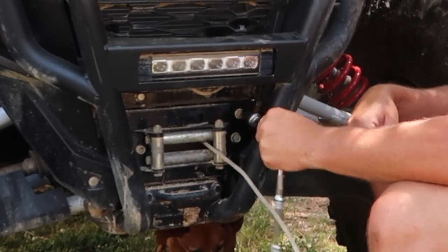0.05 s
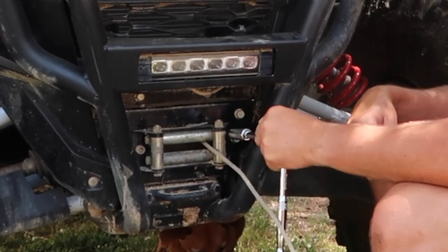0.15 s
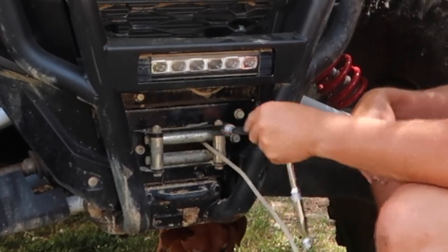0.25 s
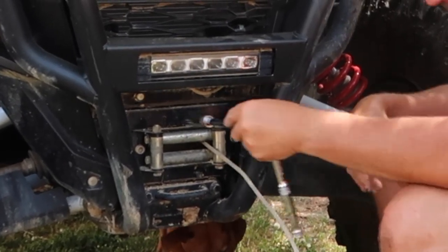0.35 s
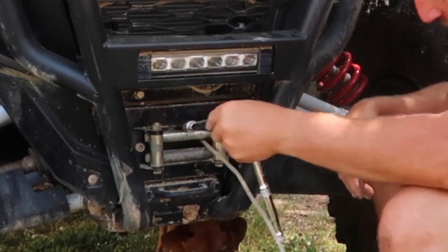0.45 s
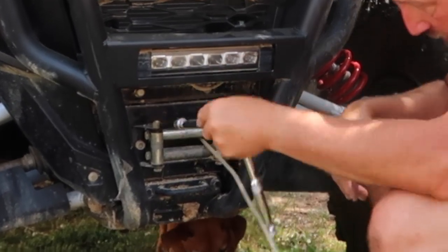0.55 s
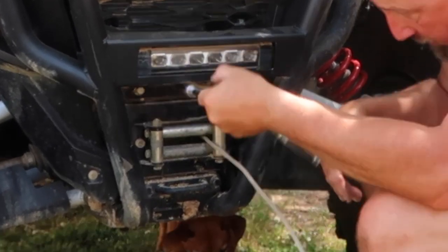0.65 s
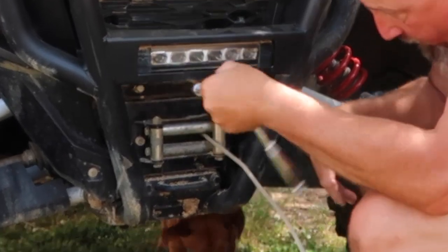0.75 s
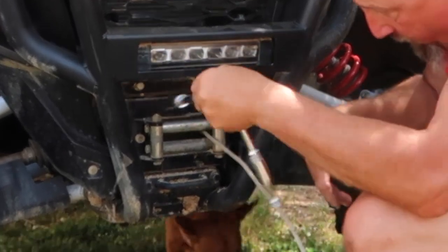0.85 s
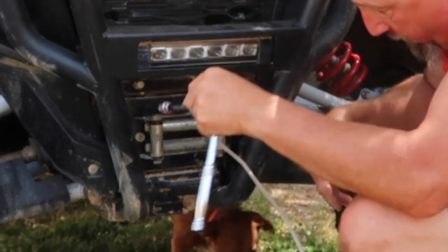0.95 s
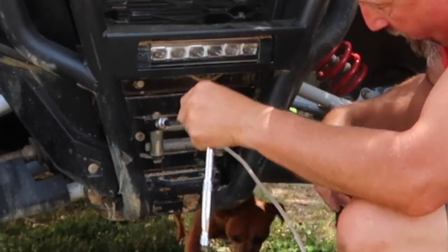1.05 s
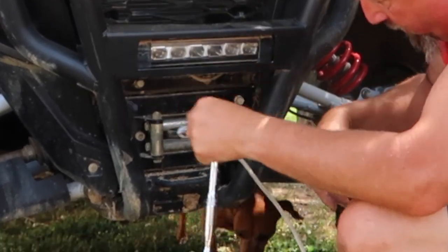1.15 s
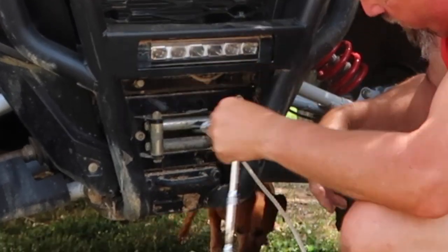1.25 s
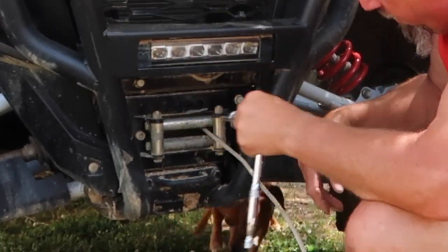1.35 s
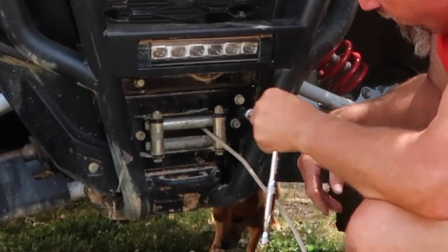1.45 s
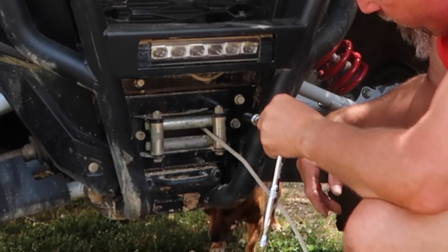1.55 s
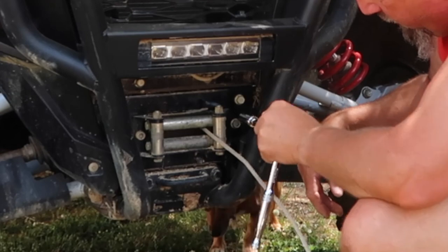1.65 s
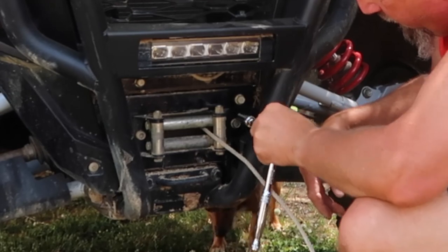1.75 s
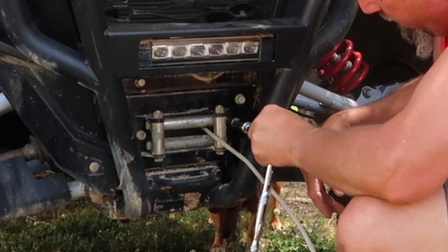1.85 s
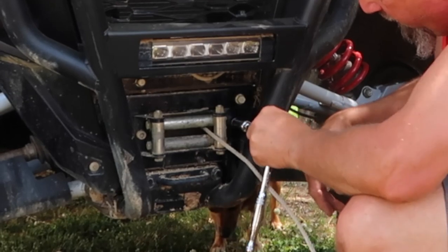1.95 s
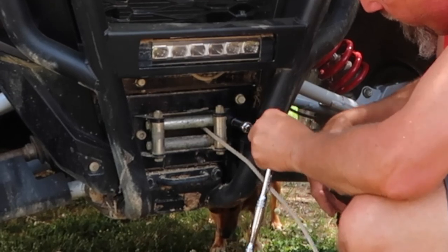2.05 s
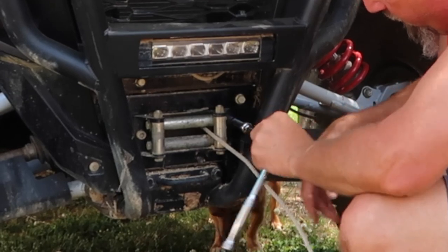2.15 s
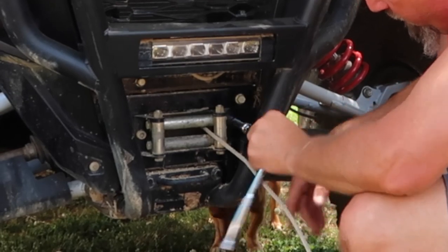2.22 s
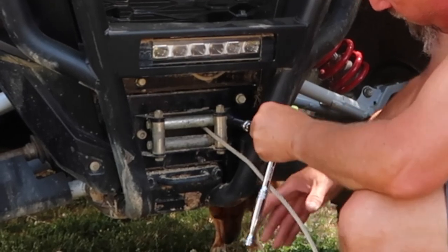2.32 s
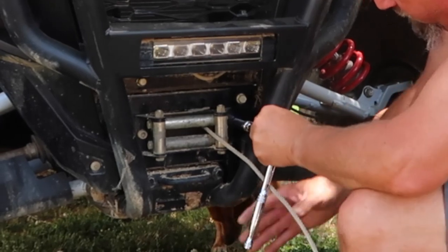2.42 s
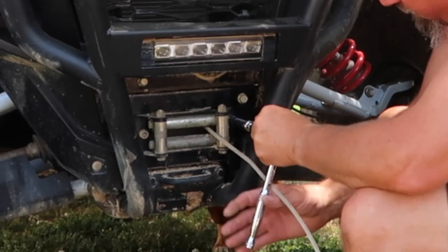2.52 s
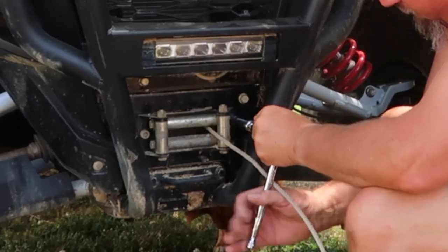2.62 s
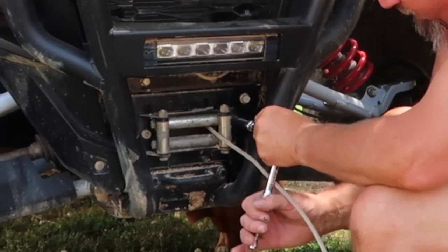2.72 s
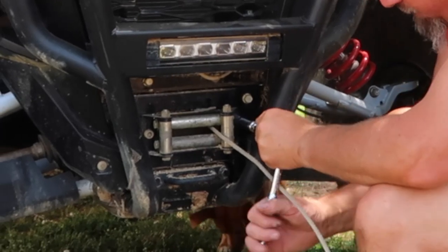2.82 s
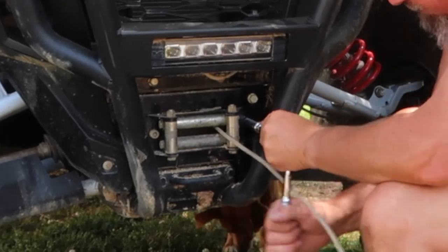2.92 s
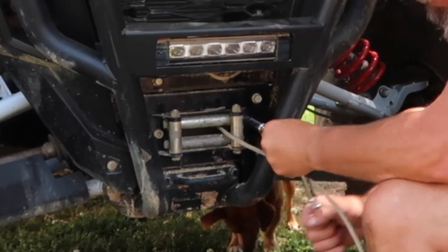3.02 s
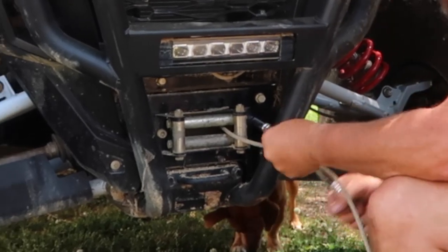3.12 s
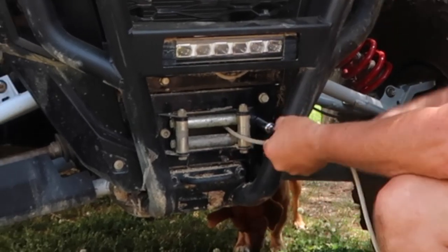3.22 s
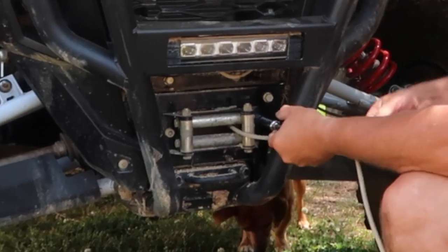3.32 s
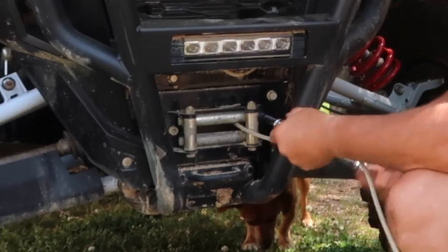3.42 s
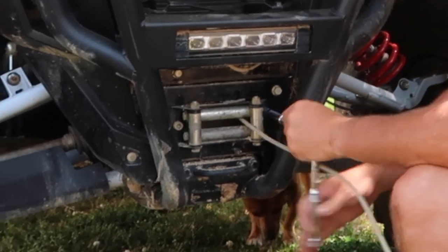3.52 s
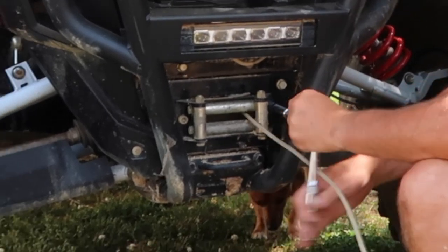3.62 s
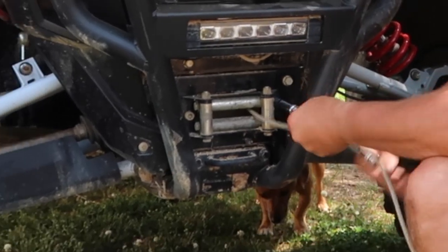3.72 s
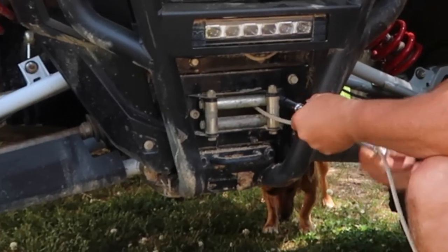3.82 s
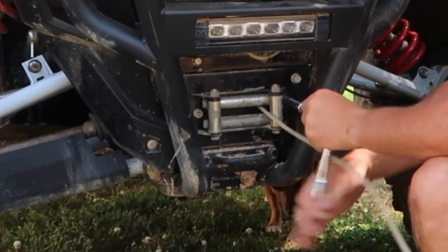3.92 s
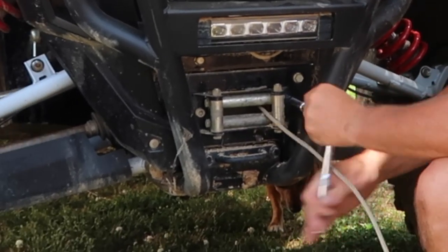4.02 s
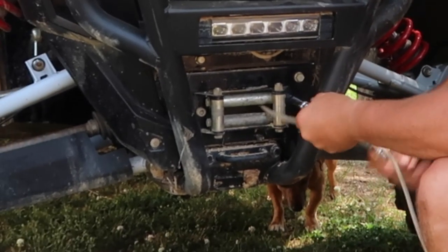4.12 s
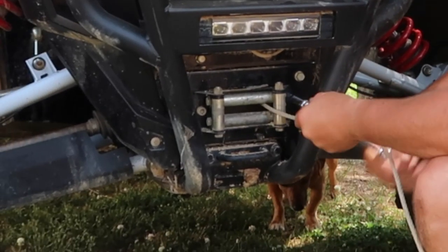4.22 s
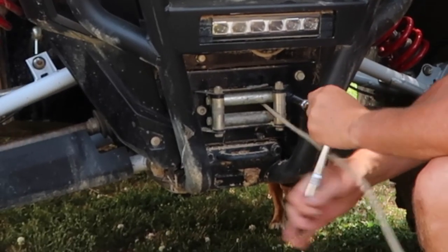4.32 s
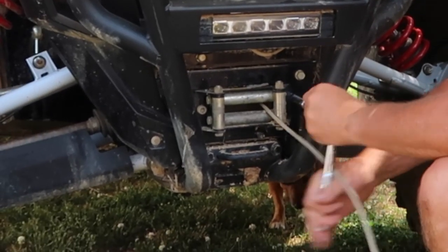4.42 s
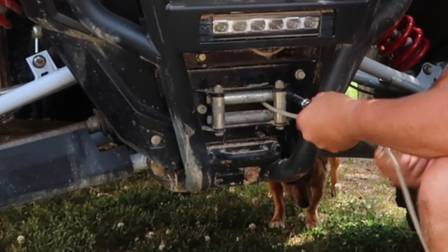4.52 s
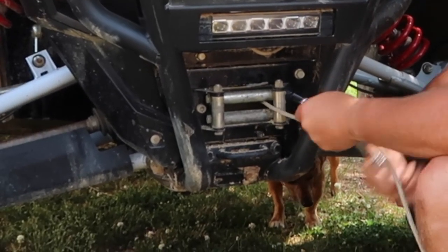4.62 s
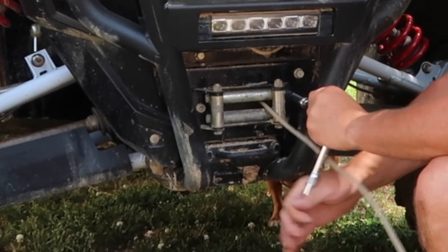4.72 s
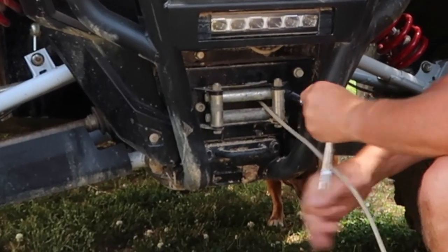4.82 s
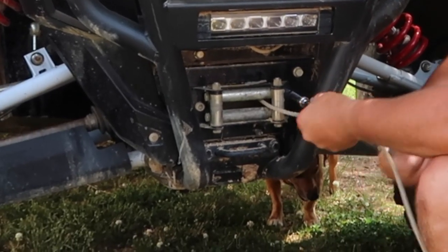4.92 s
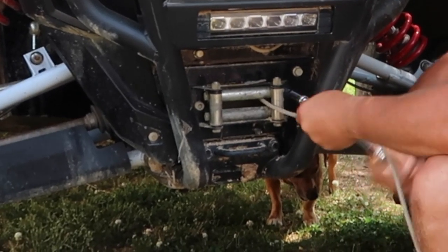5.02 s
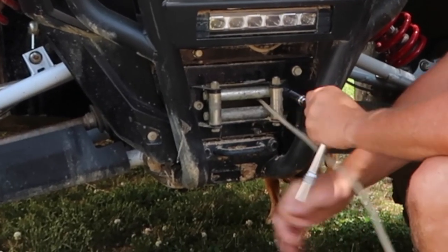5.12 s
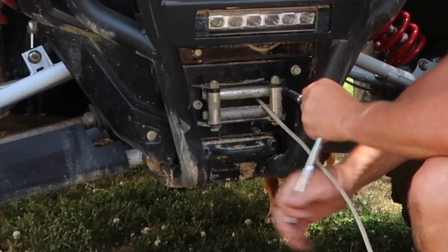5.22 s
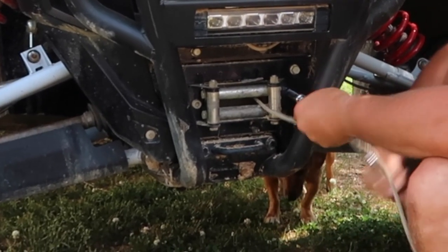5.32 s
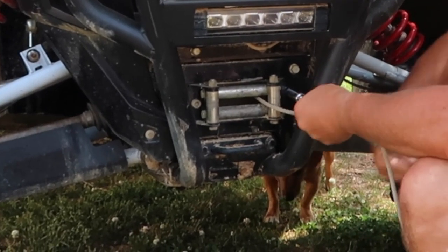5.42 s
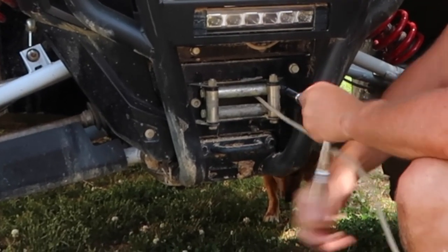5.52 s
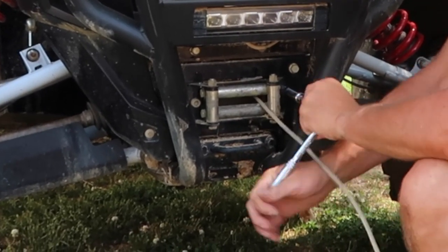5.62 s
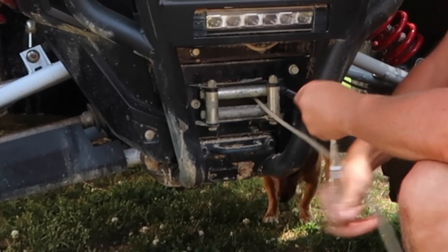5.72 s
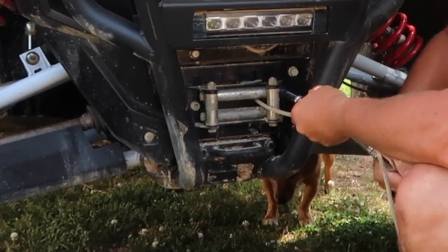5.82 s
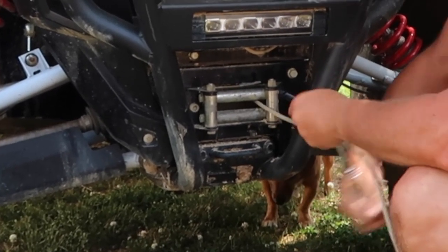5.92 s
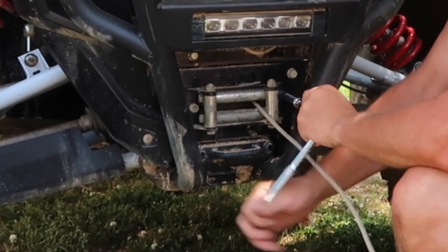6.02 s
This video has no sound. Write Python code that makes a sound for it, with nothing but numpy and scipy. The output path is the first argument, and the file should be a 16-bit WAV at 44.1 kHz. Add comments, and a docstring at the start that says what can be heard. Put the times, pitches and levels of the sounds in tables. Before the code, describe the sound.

Outdoors, one hard steel snap rings a vehicle frame, a loose socket clinks on a bolt, then a ratchet clicks in seven quick runs.

```python
"""Ratchet on a steel front plate

Outdoors on grass, no walls near: a socket ratchet works a bolt on an off-road vehicle, straight ahead of a stereo pair.
Far off, a motor hums as two wavering sines over low rumble and faint air of coloured noise; small ticks, rubs and chirps.
One hard snap, noise bursts and ringing modes, sounds the frame and ducks the recorder's gain; the socket clinks on the bolt.
On each return swing the pawl rattles over the teeth, click by click, then knocks as it takes hold again."""
import sys
import numpy as np
from scipy import signal
from scipy.fft import rfft, irfft, next_fast_len
from scipy.io import wavfile
from scipy.ndimage import map_coordinates

SR = 44100
rng = np.random.default_rng(int(sys.argv[2]) if len(sys.argv) > 2 else 0)


def transcribe(signal):
    """Save signal, clipped to [-1, 1], as a 16-bit WAV file at the path in sys.argv[1]."""
    frames = np.atleast_2d(signal).T
    limited = np.clip(frames, -1, 1)
    pcm = np.round(limited * 32767).astype(np.int16)
    wavfile.write(sys.argv[1], SR, pcm)


N = 267246

# Levels in the tables are relative where a layer adds its own trim.
# far motor, slow swells of its octave: (time [s], level [dB])
OCTAVE_SWELLS = [(0.0, -47), (0.2, -42), (1.47, -51), (2.21, -37.5), (2.5, -48.5), (5.81, -36), (5.92, -60),
                 (6.06, -43.5)]
# colour of the open air: (frequency [Hz], density [dB per Hz])
AIR_COLOUR = [(18, -15.5), (33, -14), (48, -3.5), (70, -5), (140, -2.5), (200, -11), (390, -18.5),
              (650, -25.5), (1050, -28), (1330, -28), (1550, -31), (3500, -38), (7000, -49), (15000, -64)]
# the bolt rubs faintly in its thread: (time [s], level [dB])
RUBS = [(0.266, -48), (0.526, -48), (2.191, -54), (2.799, -55), (3.041, -50)]
# faint high chirps: (time [s], level [dB], start pitch [Hz], held pitch [Hz])
CHIRPS = [(1.037, -53, 3600, 3860), (2.678, -49.5, 4900, 3740)]
# small dry ticks of the pawl and the loose joints: (time [s], level [dB])
TICKS = [(0.055, -39.5), (0.089, -40), (0.501, -45.5), (2.331, -36), (3.486, -39), (3.7743, -34),
         (4.141, -48), (4.153, -43), (4.528, -28), (4.902, -33.5), (5.363, -32), (5.808, -41)]
# the loose socket meets the bolt head and rebounds:
# (time [s], knock [dB], treble lift [dB], plate ring [dB], socket ring [dB], socket sharp by [Hz])
CLINKS = [(1.6751, -12, -8.5, -32, -20, 8.5), (1.6858, -18, -11, -25.5, -28.5, 58.5),
          (1.984, -17, -6.5, -35.5, -36, 0.5), (2.003, -24.5, 6.5, -43, -43, 7.5),
          (2.2405, -15, 8.5, -25, -32, 18), (2.2500, -13, -19, -28, -29, 55),
          (2.333, -26, -1.5, -42, -48, 36)]
# single knocks as the tool is handled: (time [s], level [dB], treble lift [dB])
KNOCKS = [(0.002, -27.5, -6), (0.03, -31, 4), (0.241, -35, 2), (1.799, -26.5, -16), (2.232, -24, -3),
          (2.3754, -11, 0), (3.366, -26.5, -6), (4.172, -31, -7), (4.245, -28, -10), (4.64, -40, -18),
          (5.035, -35, -16)]
# lead-in, blow and rebounds of the hard snap: (time [s], level [dB])
SNAP = [(0.761, -30.5), (0.7640, -24.5), (0.7677, 6), (0.7707, 2), (0.7833, -8.5), (0.7905, -13.5)]
# return swings of the handle: (first tooth [s], last tooth [s], hardest moment [s], level [dB],
# share that shakes the plate [dB], ping of the socket on the bolt [dB], treble lift [dB],
# the pawl takes hold again [s], level of that catch [dB])
SWINGS = [(3.5192, 3.6763, 3.620, -24.5, -8.5, -5, -1.5, 3.7745, -15),
          (3.9746, 4.067, 4.026, -22.5, 1.5, -22, -2, 4.141, -19.5),
          (4.3582, 4.458, 4.402, -23, 2.5, -5.5, -1.5, 4.533, -19),
          (4.744, 4.854, 4.778, -25, 2, -22, 3.5, 4.946, -26),
          (5.155, 5.279, 5.205, -22.5, -0.5, -18, 1, 5.367, -20.5),
          (5.5808, 5.713, 5.615, -22, -0.5, -6.5, 2, 5.804, -22),
          (6.04, 6.149, 6.080, -28.5, 10, 1.5, 5, 6.24, -23)]
# teeth passed in each swing: (teeth [count])
TEETH = [18, 14, 15, 16, 17, 17, 17]

# ringing modes of the vehicle's frame, the socket, the front plate with the wrench on it, and the ratchet head:
# (frequency [Hz], level [dB], decay by 60 dB [s])
FRAME_MODES = [(300, 3.5, 0.24), (392, -6, 0.83), (802, 2, 0.19), (963, -3.5, 0.26), (1020, 4, 0.26),
               (1172, 5.5, .23), (1340, -10, .75), (1570, -1, .24), (1696, -5, .3), (2083, -6.5, 0.35),
               (2234, 12, .16), (2400, -0.5, 0.32), (2649, -7, .29), (2765, 2, 0.12), (3074, -4, .28),
               (3200, -1, .27), (3372, -2, .22), (3375, -1, 0.24), (3430, -11, 0.6), (3746, -2.5, .2),
               (4140, -8, 0.28), (4183, -6, 0.35), (4376, -2.5, .16), (4511, -8, .28), (4613, -5, .16),
               (4931, -2, .2), (5082, -2.5, 0.24), (5728, -3.5, .14), (6255, -9, .15), (6578, -8.5, 0.21),
               (7063, -12.5, .2), (7985, -6.5, .16)]
SOCKET_MODES = [(3002, 2, 0.3), (3075, -11, 0.38), (3090, 3.5, 0.14), (3230, -26, 0.25)]
PLATE_MODES = [(914.4, -5.5, 0.23), (1026.7, -11.5, 0.2), (1068, -2, 0.11), (1215, -8.5, 0.19),
               (1299, -15.5, 0.46), (1587, -6, 0.14), (1677, 1.5, 0.045), (2222, 8, 0.023),
               (2316, -15, 0.19), (2496, -11.5, 0.19), (3206, -20, 0.34), (3740, -21, 0.28),
               (3930, -27, 0.2), (4310, -20, 0.19), (5440, -18, 0.084)]
HEAD_MODES = [(2465, 4.5, 0.065), (2600, 0, 0.041), (3165, -3.5, 0.053), (3310, -14.5, 0.027),
              (3780, -2.5, 0.088), (4086, 2, 0.041), (4560, -3, 0.042), (5290, -9, .03),
              (5990, -1.5, 0.028), (7130, -8, 0.03), (11000, -18, .025)]
# dense modes of the bodywork, decay at unit length: (frequency [Hz], decay by 60 dB [s])
DAMPING = [(250, 0.65), (1000, 0.33), (3000, 0.26), (6000, 0.19), (12000, 0.25)]

# noise colours of pawl clicks, rattling panels, knocks, the snap's crack and clang, the socket's landing, small ticks:
# (frequency [Hz], density [dB per Hz])
PAWL_COLOUR = [(650, -19), (870, -9.5), (1250, 1.5), (1490, -12.5), (2140, 0.5), (2460, 1.5), (2830, -7),
               (3320, -1.5), (4930, -9), (6870, -14), (8700, -23), (11600, -19), (15500, -35)]
RATTLE_COLOUR = [(300, -12), (700, -16), (950, -19), (1600, 2), (1900, -4), (2350, -2), (2800, -2.5),
                 (3900, -2.5), (5300, -11), (7200, -9.5), (8900, -28), (11500, -21), (15500, -42)]
THUD_COLOUR = [(150, -38), (260, 1), (450, -4.5), (680, -10), (1000, 3), (1500, -3.5), (1900, -7),
               (2400, -4.5), (2800, -14.5), (3200, -4.5), (4500, -17.5), (6800, -24.5), (10000, -36),
               (15000, -59)]
CRACK_COLOUR = [(180, -53), (300, -27), (821, -27), (1090, -17.5), (1840, -22), (2040, -8), (2440, 5.5),
                (2770, 5.5), (3230, -12.5), (4210, -1.5), (5210, -3), (5760, -15.5), (11100, -21),
                (15500, -35)]
CLANG_COLOUR = [(150, -17.5), (310, -6.5), (600, -12), (1100, 2), (1700, -12), (2350, 4), (2900, -7),
                (4800, -2), (5800, -9.5), (8200, -11), (10000, -24.5), (14500, -29)]
LANDING_COLOUR = [(150, -17), (370, -3.5), (600, -8.5), (790, -9.5), (950, -4.5), (1350, -6), (1620, 2),
                  (1950, -9.5), (2200, -2), (2700, -1), (4200, -5), (5500, -11.5), (7600, -26), (9500, -27),
                  (15000, -44)]
TICK_COLOUR = [(800, 5), (2000, 0), (3500, 3), (6500, -6), (9000, -12), (15000, -21.5)]

# stereo width of the tool, the whole frame and the open air: (frequency [Hz], side over mid [dB])
NEAR_WIDTH = [(200, -38), (1300, -18), (2400, -23.5), (4400, -10), (8000, -2), (15000, -6)]
BROAD_WIDTH = [(300, -21.5), (1300, -15.5), (2400, -15.5), (4400, -6.5), (8000, 1.5)]
OPEN_WIDTH = [(60, -35), (110, -39.5), (200, -20.5), (380, -11), (1300, -8), (2400, -4.5), (4400, 3),
              (15000, 5)]
# reach of a treble lift: (frequency [Hz], share of the lift [ratio])
LIFT_REACH = [(1800, 0.097), (6000, 0.79)]

RUMBLE_DB, AIR_DB, HUM_DB = -39.5, -49, -42.5  # mean levels; the hum's is that of its fundamental
# the handle turns round before the first tooth and knocks through its play; level relative to the shaking of the plate
TURN_LEAD_S, TURN_DB, TURN_TREBLE_DB = .024, -5.5, 4
CATCH_TREBLE_DB = 0  # the pawl catches with a dull knock
# the loose joints jiggle at random for a while after the last tooth
JIGGLE_S, JIGGLE_DB, JIGGLE_SCATTER_DB, JIGGLE_TREBLE_DB = .2, -36, 4.5, 3
# uneven teeth: spread of click strength, of the gaps (share) and of the socket's ping (share of its pitch)
TOOTH_SCATTER_DB, GAP_SCATTER, PING_SCATTER = 2.0, .025, .035
# one click: decay, rise, share of its power common to its neighbours; a new grip retunes the head (share of its pitch)
TOOTH_T60_S, TOOTH_ATTACK_S, ALIKE, GRIP_SCATTER = .014, .0009, .45, .012
# under pressure the pawl bounces once on the tooth: mean delay, level, spread of level, decay
BOUNCE_S, BOUNCE_DB, BOUNCE_SCATTER_DB, BOUNCE_T60_S = .0038, -5, 3, .008
SWELL_DB = 14  # clicks weaken by this much one swing length away from the hardest moment
# the socket pings on the bolt with each click, higher the harder it is pressed on
PING_LOOSE_HZ, PING_PRESSED_HZ, PING_T60_S, PING_ATTACK_S = 3100, 3794, .019, .0005
SAG_HZ, SAG_S = 60, .02  # the socket's ring starts this much sharper still; time constant of the sag
# the rocking socket flutters: knots a second, depth in level and in pitch
FLUTTER_RATE, FLUTTER_DB, FLUTTER_HZ = 90, 2.2, 13
TOP_HZ = 15750  # band limit of the recorder


def amp(db):
    """Decibels to gain."""
    return 10 ** (np.asarray(db) / 20)


def unit(x):
    """Scale to rms 1."""
    return x / np.sqrt(np.mean(x ** 2) + 1e-20)


def along(points, hz):
    """Read (Hz, value) points on a log axis."""
    f, v = np.transpose(points)
    return np.interp(np.log(hz + 1), np.log(f + 1), v)


def wobble(rate):
    """A smooth random curve, rate knots a second."""
    knots = rng.standard_normal(int(N * rate / SR) + 4)
    return map_coordinates(knots, [np.arange(N) * rate / SR])


def filtered(x, response):
    """Shape the spectrum of x by a response of frequency."""
    n = x.shape[-1]
    m = next_fast_len(n + n // 8)
    return irfft(rfft(x, m) * response(np.fft.rfftfreq(m, 1 / SR)), m)[..., :n]


def fade(t, t60):
    """Free decay, 60 dB in t60 seconds."""
    return np.exp(-np.log(1000) * t / t60)


def rise(t, attack):
    """Onset that nears full strength with time constant attack in seconds."""
    return 1 - np.exp(-t / attack)


def add(track, s, sound):
    """Mix a sound into the track at time s."""
    i = int(np.clip(round(s * SR), 0, N))
    track[:, i:i + sound.shape[-1]] += sound[..., :N - i]


def noise(colour, size, treble_db=0, width=NEAR_WIDTH):
    """Stereo noise of a given colour, its side-to-mid balance set along frequency."""
    pair = unit(filtered(rng.standard_normal((2, size)), lambda hz: amp(along(colour, hz))))

    def mid_side_gain(hz):
        lift = amp(treble_db * along(LIFT_REACH, hz))
        return lift * np.array([np.ones_like(hz), amp(along(width, hz))])

    mid, side = filtered(pair, mid_side_gain)
    return np.array([mid + side, mid - side])


def burst(colour, t60, treble_db=0, attack=0.00015, width=NEAR_WIDTH):
    """The short crack of steel meeting steel: decaying coloured noise."""
    t = np.arange(SR // 20) / SR
    return noise(colour, len(t), treble_db, width) * fade(t, t60) * rise(t, attack)


def bodywork(colour, length, treble_db=0, width=NEAR_WIDTH, attack=.0025):
    """Dense panel modes build up after a blow, as noise whose bands each decay at their own rate."""
    t = np.arange(SR // 4) / SR
    hz, times, z = signal.stft(noise(colour, len(t), treble_db, width), SR, nperseg=256)
    t60 = length * along(DAMPING, hz)[:, None]
    tail = signal.istft(z * fade(times, t60), SR, nperseg=256)[1][:, :len(t)]
    return tail * rise(t, attack)


def ring(modes, scatter_db, attack, count=1):
    """Clear modes as decaying sines, one row for each blow, each struck at new strengths."""
    t = np.arange(SR // 2) / SR
    hz, db, t60 = np.transpose(modes)
    waves = np.exp(np.outer(2j * np.pi * hz - np.log(1000) / t60, t))
    gain = amp(db + scatter_db * rng.standard_normal((count, len(hz))))
    phase = np.exp(2j * np.pi * rng.random((count, len(hz))))
    return ((gain * phase) @ waves).real * rise(t, attack)


def outdoors(split_hz=350, motor_hz=51.67, octave_db=-0.2):
    """Low rumble and faint air from one wide noise, and a far motor's fundamental and octave, wavering."""
    wash = noise(AIR_COLOUR, N, width=OPEN_WIDTH)
    low = filtered(wash, lambda hz: 1 / (1 + (hz / split_hz) ** 4))
    rumble = unit(low) * amp(RUMBLE_DB + .7 * wobble(8.6))
    air = unit(wash - low) * amp(AIR_DB + 1.4 * wobble(17))
    phase = 2 * np.pi * np.cumsum(motor_hz * (1 + 0.01 * wobble(7.6))) / SR
    swell_s, swell_db = np.transpose(OCTAVE_SWELLS)
    swell = np.interp(np.arange(N) / SR, swell_s, swell_db)
    fundamental = amp(HUM_DB + 2.2 * wobble(1.7)) * np.sin(phase)
    octave = amp(swell + octave_db + 2.5 * wobble(6)) * np.sin(2 * phase)
    return rumble + air + fundamental + octave


def rubs(centre_hz=1320, width_hz=150, length=0.069):
    """Short, soft swells of friction: noise through one resonance of the plate."""
    out = np.zeros((2, N))
    swell = np.hanning(int(length * SR))
    resonance = lambda hz: 1 / (1 + (2 * (hz - centre_hz) / width_hz) ** 2)
    for s, db in RUBS:
        friction = unit(filtered(rng.standard_normal(len(swell)), resonance))
        add(out, s - length / 2, amp(db) * swell * friction)
    return out


def chirps(slide_s=0.011, attack=0.005, t60=0.17):
    """Thin whistles: sines that slide to one pitch and fade."""
    out = np.zeros((2, N))
    t = np.arange(SR // 8) / SR
    for s, db, start_hz, held_hz in CHIRPS:
        hz = held_hz + (start_hz - held_hz) * np.exp(-t / slide_s)
        whistle = np.sin(2 * np.pi * np.cumsum(hz) / SR)
        add(out, s, amp(db) * rise(t, attack) * fade(t, t60) * whistle)
    return out


def ticks(t60=0.026):
    """Light contacts as noise bursts, too weak to wake the plate."""
    out = np.zeros((2, N))
    for s, db in TICKS:
        add(out, s, amp(db) * burst(TICK_COLOUR, t60, attack=0.0007))
    return out


def socket_ring(sharp_hz, attack=0.0019):
    """The socket's close modes start sharp, then sag and flutter as it rocks on the bolt."""
    t = np.arange(SR // 2) / SR
    flutter_hz = FLUTTER_HZ * wobble(FLUTTER_RATE)[:len(t)]
    shift = np.cumsum(sharp_hz + SAG_HZ * np.exp(-t / SAG_S) + flutter_hz) / SR  # in cycles
    rocking = amp(FLUTTER_DB * wobble(FLUTTER_RATE)[:len(t)]) * rise(t, attack)
    modes = sum(amp(db) * fade(t, t60) * np.sin(2 * np.pi * (hz * t + shift)) for hz, db, t60 in SOCKET_MODES)
    return rocking * modes


def clinks(crack_db=-7, panel_db=-10.0):
    """Each landing knocks the plate and sets the socket ringing."""
    out = np.zeros((2, N))
    for s, db, treble_db, plate_db, ring_db, sharp_hz in CLINKS:
        add(out, s, amp(db + crack_db) * burst(LANDING_COLOUR, t60=0.023, treble_db=treble_db))
        add(out, s, amp(db + panel_db) * bodywork(LANDING_COLOUR, length=0.6, treble_db=treble_db))
        add(out, s, amp(plate_db) * ring(PLATE_MODES, scatter_db=1.0, attack=0.0016))
        add(out, s, amp(ring_db) * socket_ring(sharp_hz))
    return out


def swing_contacts(count=4):
    """Each swing knocks as it turns round, jiggles and catches: rows of (time [s], level [dB], treble lift [dB])."""
    rows = []
    for start, end, _, db, plate_db, _, _, catch, catch_db in SWINGS:
        rows.append((start - TURN_LEAD_S, db + plate_db + TURN_DB, TURN_TREBLE_DB))
        rows.append((catch, catch_db, CATCH_TREBLE_DB))
        for k in range(count):
            s = end + JIGGLE_S * (k + rng.random()) / count
            rows.append((s, JIGGLE_DB + JIGGLE_SCATTER_DB * rng.standard_normal(), JIGGLE_TREBLE_DB))
    return rows


def knocks(crack_db=-8.0, panel_db=-15, ring_db=-11):
    """Each knock is a crack, a dull panel answer and the ring of the plate."""
    out = np.zeros((2, N))
    contacts = KNOCKS + swing_contacts()
    plates = ring(PLATE_MODES, scatter_db=1.0, attack=0.0054, count=len(contacts))
    for (s, db, treble_db), plate in zip(contacts, plates):
        add(out, s, amp(db + crack_db) * burst(THUD_COLOUR, t60=0.018, treble_db=treble_db, attack=0.00011))
        add(out, s, amp(db + panel_db) * bodywork(THUD_COLOUR, length=0.74, treble_db=treble_db))
        add(out, s, amp(db + ring_db) * plate)
    return out


def tubes(low_hz=900, high_hz=7000, t60_at_3k=.3, side_db=-10, count=80):
    """The welded tubes ring on in many weak modes; the high ones die sooner."""
    pitches = low_hz + (high_hz - low_hz) * rng.random(count)
    modes = [(hz, along(CLANG_COLOUR, hz), t60_at_3k * (3000 / hz) ** .3) for hz in pitches]
    mid, side = ring(modes, scatter_db=1, attack=.004, count=2)
    return np.array([mid + amp(side_db) * side, mid - amp(side_db) * side])


def snap(panel_db=-12, tubes_db=-40, ring_db=-26):
    """A hard steel blow with quick rebounds; the main blow sets the whole frame ringing."""
    out = np.zeros((2, N))
    for s, db in SNAP:
        add(out, s, amp(db) * burst(CRACK_COLOUR, t60=0.037, attack=.0001, width=BROAD_WIDTH))
    s, db = max(SNAP, key=lambda contact: contact[1])  # the loudest is the main blow
    add(out, s, amp(db + panel_db) * bodywork(CLANG_COLOUR, length=.62, width=BROAD_WIDTH))
    add(out, s, amp(db + tubes_db) * tubes())
    add(out, s, amp(db + ring_db) * ring(FRAME_MODES, scatter_db=0.5, attack=0.013))
    return out


def ping(hz, t60, attack):
    """One quickly damped resonance."""
    t = np.arange(SR // 20) / SR
    return np.sin(2 * np.pi * (hz * t + rng.random())) * fade(t, t60) * rise(t, attack)


def drifting_clicks(angle, treble_db):
    """One click for each tooth; neighbours are alike, but the colour drifts as the handle turns."""
    click = lambda: burst(PAWL_COLOUR, TOOTH_T60_S, treble_db, TOOTH_ATTACK_S)
    first, last = click(), click()
    clicks = []
    for turn in angle * np.pi / 2:
        common = np.cos(turn) * first + np.sin(turn) * last
        clicks.append(np.sqrt(ALIKE) * common + np.sqrt(1 - ALIKE) * click())
    return clicks


def tooth_times(start, end, angle, run_up=.17, run_out=.035, easing=.37):
    """The handle is fastest in mid swing, so the clicks crowd there; gaps are slightly uneven."""
    speed = ((angle + run_up) * (1 + run_out - angle)) ** easing
    gaps = (1 + GAP_SCATTER * rng.standard_normal(len(angle) - 1)) / speed[1:]
    return start + (end - start) * np.append(0, np.cumsum(gaps)) / gaps.sum()


def gripped_head(treble_db):
    """Modes of the ratchet head, retuned by a new grip."""
    return [(hz * (1 + GRIP_SCATTER * rng.standard_normal()), db + treble_db * along(LIFT_REACH, hz), t60)
            for hz, db, t60 in HEAD_MODES]


def ratchet(shake_db=14, shake_lag=0.055, tick_db=2, body_db=-21, head_db=-14.5, panel_db=-10,
            ring_db=-21.0, stop_db=0.5, ping_db=5):
    """The pawl drops off each tooth; clicks swell around the hardest moment and shake head, socket and plate."""
    out = np.zeros((2, N))
    for (start, end, hardest, db, plate_db, socket_db, treble_db, _, _), count in zip(SWINGS, TEETH):
        angle = np.arange(count) / (count - 1)
        times = tooth_times(start, end, angle)
        offset = (times - hardest) / (end - start)
        sizes = amp(db - SWELL_DB * offset ** 2 + TOOTH_SCATTER_DB * rng.standard_normal(count))
        sizes[-1] *= amp(stop_db)  # the pawl drops fully into the last tooth
        # a socket pressed hard on the bolt passes more of each click into the plate, pings higher
        # and makes the pawl bounce
        shares = amp(plate_db - shake_db * (offset - shake_lag) ** 2)
        pressed = np.minimum(shares ** 2, 1)
        pitches = PING_LOOSE_HZ + (PING_PRESSED_HZ - PING_LOOSE_HZ) * pressed
        body = amp(body_db) * bodywork(PAWL_COLOUR, length=1.0, treble_db=treble_db)
        panel = amp(panel_db) * bodywork(RATTLE_COLOUR, length=0.6)
        # the contact shifts from tooth to tooth, so each click favours other modes
        heads = amp(head_db) * ring(gripped_head(treble_db), scatter_db=4.2, attack=0.0005, count=count)
        plates = amp(ring_db) * ring(PLATE_MODES, scatter_db=9.0, attack=0.0018, count=count)
        clicks = drifting_clicks(angle, treble_db)
        teeth = zip(times, sizes, shares, pressed, pitches, clicks, heads, plates)
        for s, size, share, press, pitch, click, head, plate in teeth:
            ping_hz = pitch * (1 + PING_SCATTER * rng.standard_normal())
            socket = amp(ping_db + socket_db) * ping(ping_hz, PING_T60_S, PING_ATTACK_S)
            for part in (amp(tick_db) * click, socket, head, body, share * panel, share * plate):
                add(out, s, size * part)
            bounce_gain = amp(BOUNCE_DB + BOUNCE_SCATTER_DB * rng.standard_normal())
            bounce = bounce_gain * burst(PAWL_COLOUR, BOUNCE_T60_S, treble_db)
            add(out, s + BOUNCE_S * (.5 + rng.random()), size * press * bounce)
    return out


def scene():
    """The tool is straight ahead, with no walls near; the open air lies wide around it."""
    return outdoors() + rubs() + chirps() + ticks() + clinks() + knocks() + snap() + ratchet()


def gain_control(x, threshold_db=-11, sense_s=0.018, recover_db_per_s=8.0, deepest_db=8.5):
    """Smoothed power over the threshold pulls the gain down; it creeps back at a steady rate."""
    keep = np.exp(-1 / (sense_s * SR))
    power = signal.lfilter([1 - keep], [1, -keep], np.mean(x ** 2, axis=0))
    excess_db = np.clip(10 * np.log10(np.abs(power) + 1e-12) - threshold_db, 0, deepest_db)
    recovered_db = recover_db_per_s * np.arange(N) / SR
    # the running maximum holds the deepest cut, less what has been recovered since
    return x * amp(recovered_db - np.maximum.accumulate(excess_db + recovered_db))


def record(dry):
    """Loud sound ducks the gain, peaks clip at full scale, and nothing is kept above the band limit."""
    clipped = np.clip(gain_control(dry), -1, 1)
    return filtered(clipped, lambda hz: np.clip((TOP_HZ - hz) / 250 + .5, 0, 1))  # 250 Hz wide slope


dry = scene()
out = record(dry)
transcribe(out)
```